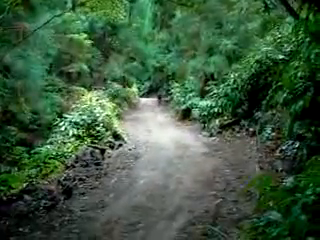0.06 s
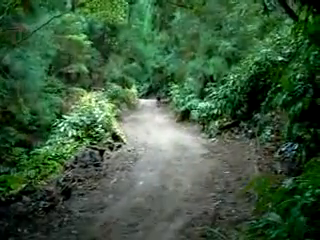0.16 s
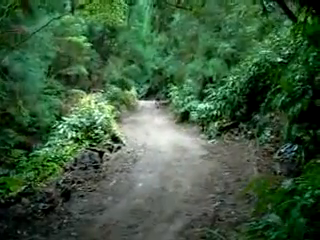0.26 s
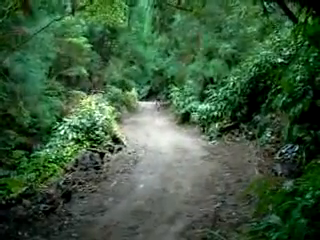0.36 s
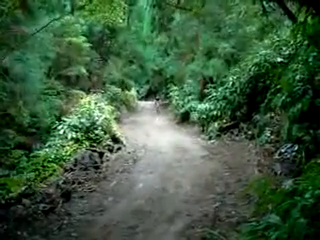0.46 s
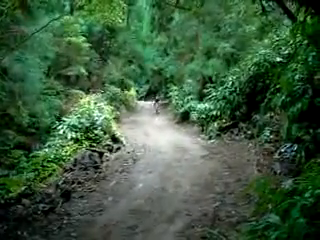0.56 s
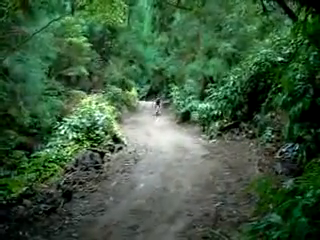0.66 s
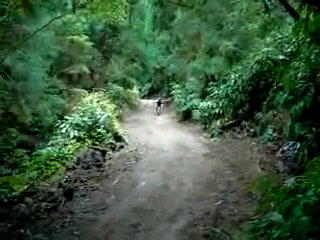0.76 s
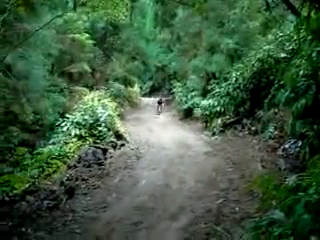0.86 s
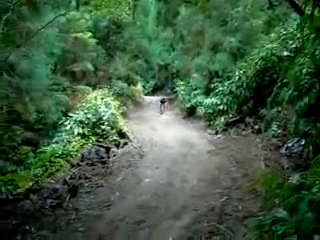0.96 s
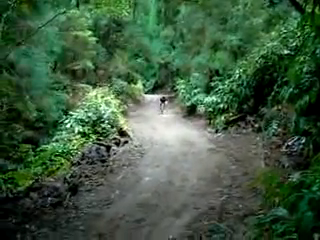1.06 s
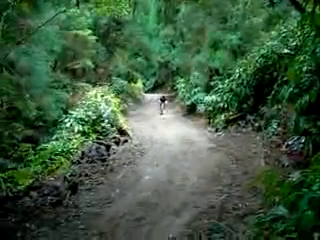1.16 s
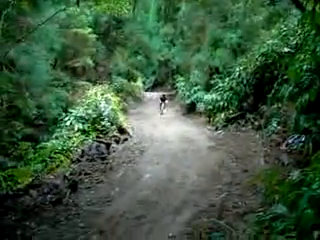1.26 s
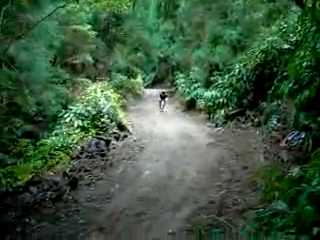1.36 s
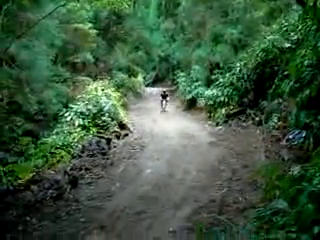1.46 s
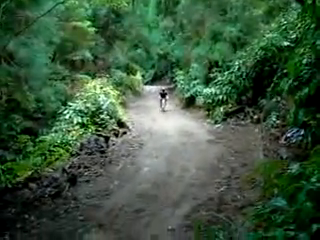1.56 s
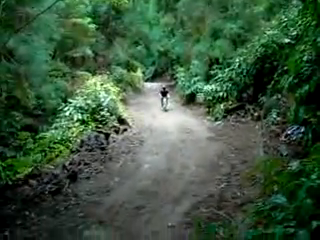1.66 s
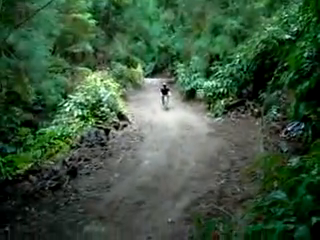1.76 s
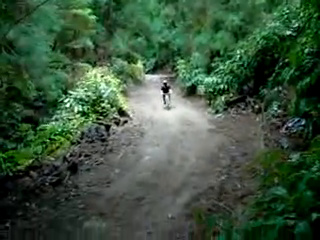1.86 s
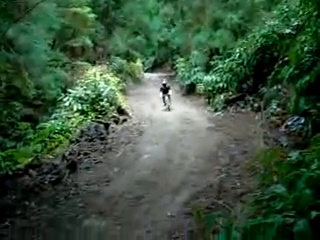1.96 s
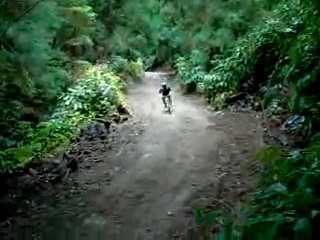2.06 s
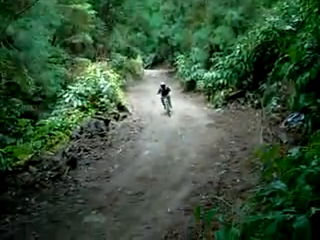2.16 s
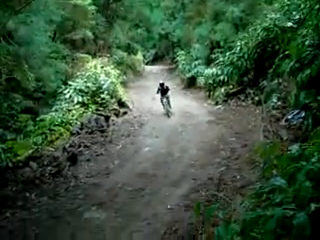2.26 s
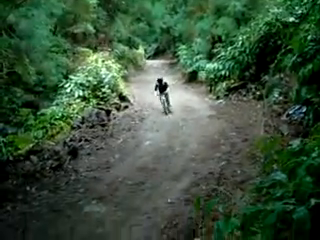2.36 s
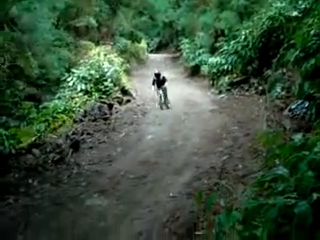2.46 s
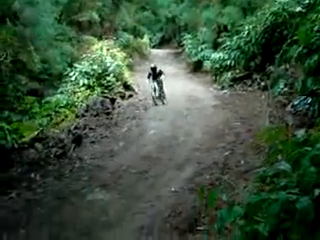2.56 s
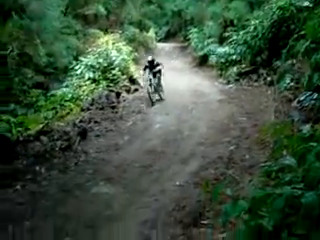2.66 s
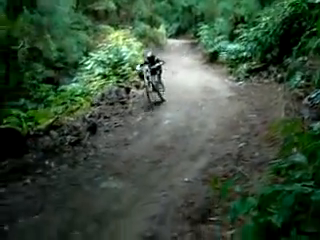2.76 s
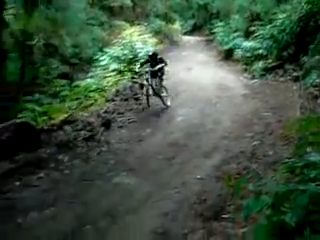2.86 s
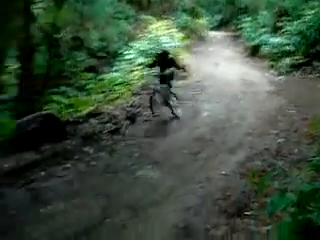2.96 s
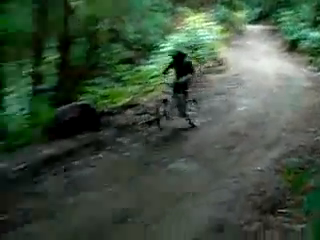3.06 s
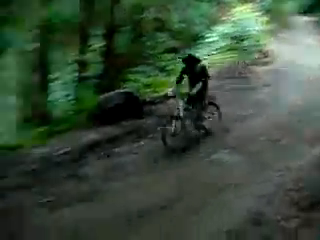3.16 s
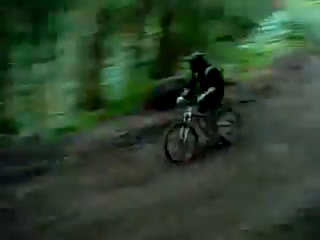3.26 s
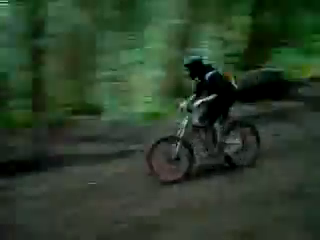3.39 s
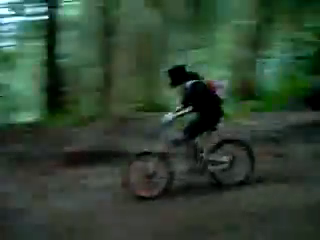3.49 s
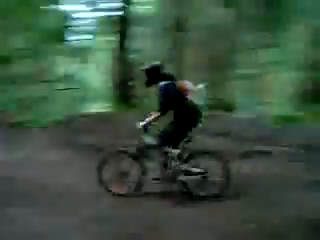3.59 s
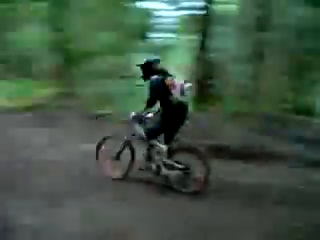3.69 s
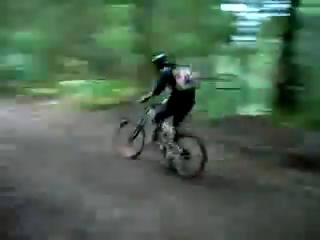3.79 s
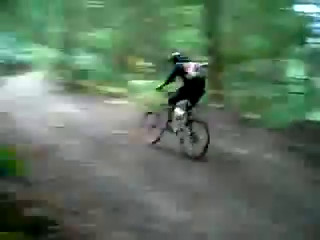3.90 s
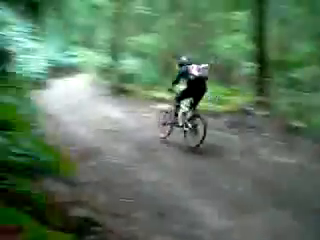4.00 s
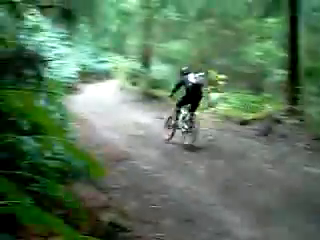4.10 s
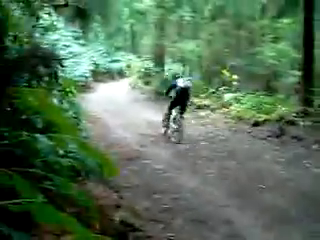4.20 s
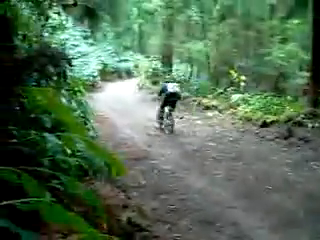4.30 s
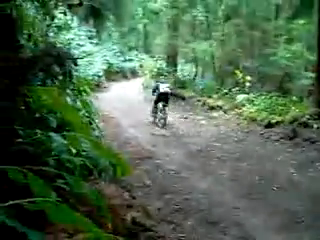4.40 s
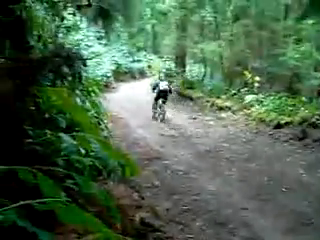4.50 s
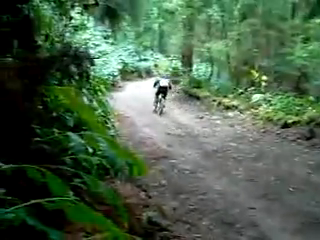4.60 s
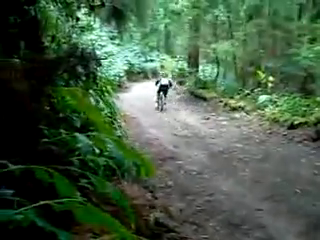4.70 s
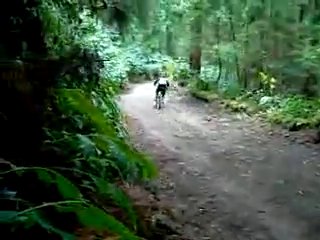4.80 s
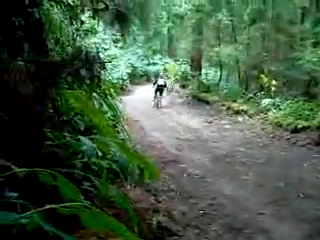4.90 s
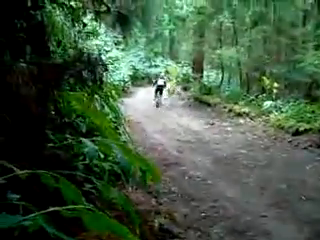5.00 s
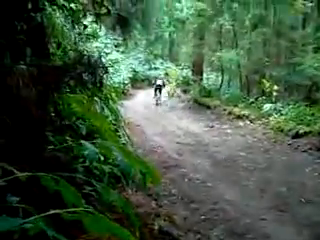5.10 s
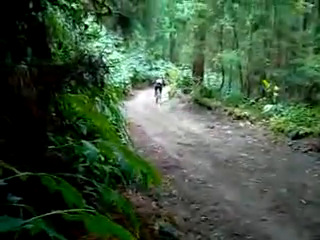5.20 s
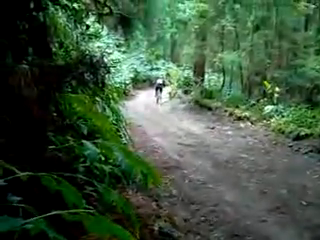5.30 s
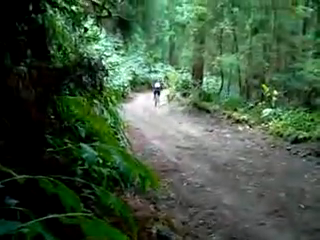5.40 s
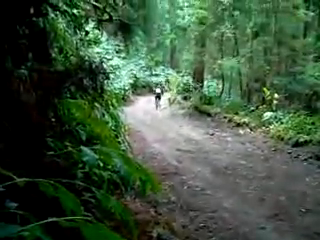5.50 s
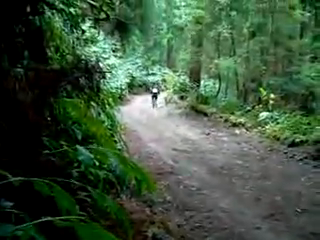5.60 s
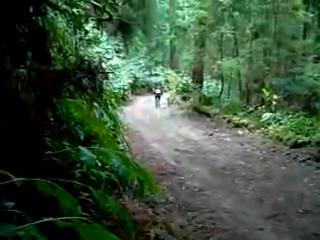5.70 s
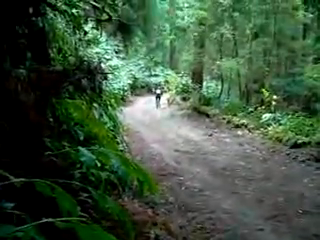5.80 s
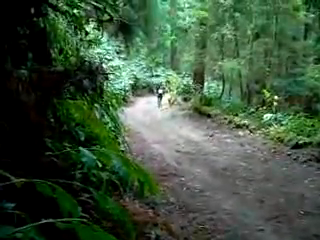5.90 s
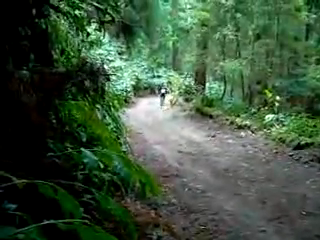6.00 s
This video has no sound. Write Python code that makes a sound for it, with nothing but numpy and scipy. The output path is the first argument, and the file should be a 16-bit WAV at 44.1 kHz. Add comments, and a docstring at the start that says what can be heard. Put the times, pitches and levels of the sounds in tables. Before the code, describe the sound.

A bicycle approaches on loose dirt outdoors, its tyres crackling and faintly humming, with sharp ticks from stones. It rushes past close to the microphone in a cluster of loud, slightly clipped rattles and thuds, with a low puff of air. Then the fast ratcheting freewheel stands out during a light moment, another landing clacks, and the crunching fades among trees. The sound is muffled at the top.

```python
"""Forest, loose dirt trail: a mountain bike rides down, passes close to a small camera and rolls away.
Knobbly tyres crunch (filtered random grains) and hum (noise smeared around the tread-block rate).
Bumps and landings clatter (shaped noise, frame sines, thuds); the freewheel buzzes (pulsed noise).
Four times the wheels go light and the tyres fade, leaving mostly the freewheel.
Wind rumbles on the microphone and the trees return a short echo."""
import sys
import numpy as np
from scipy import signal
from scipy.fft import rfft, irfft, next_fast_len
from scipy.io import wavfile
from scipy.ndimage import uniform_filter1d, minimum_filter1d, map_coordinates

SR = 44100
rng = np.random.default_rng(int(sys.argv[2]) if len(sys.argv) > 2 else 0)


def master(y):
    """Save y as 16-bit WAV."""
    cut = np.clip(np.atleast_2d(y).T, -1, 1)
    pcm = np.round(cut * 32767)  # scale
    wavfile.write(sys.argv[1], SR, pcm.astype(np.int16))


N = 266794

# All table levels are relative, ahead of the mix gains.
# microphone rumble spectrum: freq_hz, level_db
RUMBLE_SPECTRUM = [(10, 0.5), (30, -3.5), (60, -8), (110, -17.5), (250, -21.5), (1000, -29), (5000, -50)]
# forest echo decay: freq_hz, t60_s
FOREST_DECAY = [(200, 0.86), (2000, 0.22), (5000, 0.41)]
# bumps and landings: start_s, peak_db, thud_db (relative to peak_db)
BUMPS = [(0.021, -23.5, -16), (0.346, -24, -17), (0.804, -16, -15.5), (0.881, -10.5, -19),
         (1.195, -11, -31), (1.288, -15.5, -44), (1.36, -11.5, -31), (1.462, -11, -25.5), (1.86, -11, -25),
         (1.903, -7.5, -32), (2.015, -5, -26), (2.308, 0.5, -33), (2.391, -8, -21.5), (3.048, -2, -10),
         (3.092, -3.5, -18.5), (3.123, -1.5, -15.5), (3.217, 5, -11), (3.324, 5, -12), (3.338, 3.5, -17),
         (3.377, 2, -14.5), (3.606, 1, -8), (3.69, 9.5, -16.5), (3.803, 9, -22.5), (4.23, 0.5, -22.5),
         (4.463, 3, -14.5), (4.625, -12.5, -14.5), (4.877, -13.5, -3), (5.508, -17, -19),
         (5.552, -11.5, -24), (5.669, -12.5, -7), (5.876, -8.5, -24)]
# clatter spectrum: freq_hz, level_db
CLATTER_SPECTRUM = [(200, -29), (1000, -11), (1600, -1.5), (2300, 4), (3500, 2.5), (4300, -13.5),
                    (5200, -20.5)]
# thud spectrum: freq_hz, level_db
THUD_SPECTRUM = [(40, -10), (130, -11), (250, -7.5), (400, -12.5), (620, 2.5), (1000, -3.5), (1500, 0.5),
                 (2500, -9.5), (5000, -28.5)]
# frame and chain modes: freq_hz, level_db, t60_s
FRAME_MODES = [(1940, -9.5, 0.026), (2308, 10.5, .025), (2560, -7.5, 0.009), (3360, -7, 0.018),
               (3574, -1.5, 0.016), (4170, 2, 0.016)]
# pawl click spectrum: freq_hz, level_db
PAWL_SPECTRUM = [(100, -31.5), (400, -25.5), (750, -18.5), (1300, -13), (1680, -10.5), (1950, -1.5),
                 (2200, -5), (2550, -4), (2850, -3.5), (3400, -10), (3950, -15), (4400, -21), (5200, -34.5)]
# stretches on the ground: touch_down_s, go_light_s, settle_s, lift_s, grit_db, stones_db, hum_db
GROUND_ROLLS = [(0.01, 0.33, 0.01, 0.083, -35, -33.5, -33), (0.792, 2.716, 0.073, 0.044, -19.5, -28, -32.5),
                (3.034, 3.813, 0.0037, 0.081, -18, -23, -32),
                (4.241, 5.152, 0.0018, .055, -20.5, -25.5, -30), (5.395, 6.053, 0.19, .05, -20.5, -23, -27)]
# bite of the tyres into the dirt, rising and falling along the trail: time_s, level_db
TYRE_BITE = [(0, -1.5), (0.3, 3.5), (1.0, 2.5), (1.2, -2), (1.5, 0.5), (1.8, -2), (1.93, 1), (2.2, -1),
             (2.42, 4), (2.72, -3), (3.17, -4), (3.28, 3.5), (3.53, -3.5), (3.78, 1), (4.33, 1.5),
             (4.68, -1.5), (5.66, 4), (6.05, -1.5)]
# tread blocks meeting the ground: time_s, rate_hz
TREAD_RATE = [(0, 572.5), (2.5, 585.4), (3.4, 635.8), (4.5, 699.2), (6.05, 651)]
# grit spectrum: freq_hz, level_db
GRIT_SPECTRUM = [(300, -26.5), (1200, -22), (1900, -5), (2600, -1.5), (3200, 0.5), (3700, -3), (4000, -9),
                 (4350, -11), (4700, -20), (5200, -25)]
# knocking stones spectrum: freq_hz, level_db
STONE_SPECTRUM = [(40, -24), (130, -12), (195, -9.5), (260, -2.5), (320, -5), (410, -12), (700, 0),
                  (830, -2.5), (950, 1), (1100, -2), (1450, 1), (2100, 2), (2800, 2), (4000, -28.5),
                  (5200, -39.5)]
# treble gain of the grit: time_s, level_db
GRIT_TREBLE = [(0.4, 14), (1.25, -3), (1.82, 1.5), (1.92, 11.5), (2.15, 4), (2.3, -2), (2.7, 2), (4.3, 5),
               (5.1, -1.5), (5.6, -9), (6.05, 4)]

BAND_HZ, TOP_HZ = 4900, 15870  # camera's low-pass edges; BAND_HZ also caps grain pitch
PASS_S, SPEED_M_PER_S, CLOSEST_M = 3.413, 7.23, 3.286
AIR_DB, WAKE_DB = -53.5, -39.5  # still forest, peak of the rider's wake
WAKE_S, WAKE_RISE_S, WAKE_FALL_S = 3.25, 0.18, 0.88  # peak time, time constants
PEBBLE_OVER_GRIT_DB, PEBBLE_SCATTER_DB, PEBBLE_THUD_DB = 11, 1.5, -22.5
PAWL_HZ, PAWL_RISE_HZ_PER_S = 114.3, 2.3  # mean click rate at 0 s, its climb
HUB_DB, HUB_REAR_DB = -28, 1.0  # louder from behind than from the front
SHELL_HZ, SHELL_WIDTH_HZ, SHELL_DB = 2220, 550, -2  # hub shell resonance, heard from behind
STONES_DB_PER_BITE_DB, HUM_DB_PER_BITE_DB = 1.15, 1.6
HOP_DB, HOP_S = -1.5, 0.018  # tyre dip as the wheel skips before a blow, its time constant


def amp(db):
    """Decibels to gain."""
    return 10 ** (np.asarray(db) / 20)


def unit(x):
    """Scale to rms 1."""
    return x / np.sqrt(np.mean(x ** 2) + 1e-20)


def along(points, hz):
    """Interpolate (freq_hz, value) points on a log-frequency axis."""
    point_hz, values = np.transpose(points)
    return np.interp(np.log(hz + 1), np.log(point_hz), values)


def curves(rows):
    """One value per sample for each column after the time."""
    time_s, *columns = np.transpose(rows)
    return [np.interp(np.arange(N) / SR, time_s, column) for column in columns]


def wobble(knots_per_s):
    """Smooth random curve through normally distributed knots."""
    return map_coordinates(rng.standard_normal(8192), [np.arange(N) * knots_per_s / SR], mode="wrap")


def coloured(x, spectrum):
    """Minimum-phase filter with the given spectrum; white noise keeps its power."""
    size = 2 * next_fast_len(N // 2 + 8192)
    gain = unit(amp(along(spectrum, np.fft.rfftfreq(size, 1 / SR))))
    # Fold the cepstrum onto positive time: the filter becomes causal.
    cepstrum = irfft(np.log(gain))
    cepstrum[1:size // 2] *= 2
    cepstrum[size // 2 + 1:] = 0
    return irfft(rfft(x, size) * np.exp(rfft(cepstrum)))[:N]


def low_pass(x, edge_hz, order):
    """Butterworth low-pass."""
    return signal.sosfilt(signal.butter(order, edge_hz, fs=SR, output="sos"), x)


def ride():
    """Straight pass at constant speed: gain as 1/distance, and heading from -1 coming to +1 leaving."""
    ahead_m = SPEED_M_PER_S * (np.arange(N) / SR - PASS_S)
    distance_m = np.hypot(ahead_m, CLOSEST_M)
    return CLOSEST_M / distance_m, ahead_m / distance_m


def air():
    """Moving air rumbles on the microphone; the rider's wake swells quickly and dies slowly."""
    t = np.arange(N) / SR - WAKE_S
    wake = amp(WAKE_DB) * np.exp(np.minimum(t / WAKE_RISE_S, -t / WAKE_FALL_S))
    rumble = coloured(rng.standard_normal(N), RUMBLE_SPECTRUM) * amp(1.5 * wobble(8.2))
    return np.hypot(amp(AIR_DB), wake) * unit(rumble)


def forest(x):
    """Trunks and leaves scatter a short echo: noise whose decay depends on frequency."""
    hz, t, noise = signal.stft(rng.standard_normal(SR // 2), SR, nperseg=256)
    decay = amp(-60 * t / along(FOREST_DECAY, hz)[:, None])
    tail = signal.istft(noise * decay, SR, nperseg=256)[1]
    return signal.fftconvolve(x, tail / np.linalg.norm(tail))[:N]


def ground_contact():
    """Grit, stone and hum gains: settle, follow bite and distance, dip before blows, fade on lift."""
    t, gains = np.arange(N) / SR, np.zeros((3, N))
    for down_s, up_s, settle_s, lift_s, *levels_db in GROUND_ROLLS:
        settled = 1 - np.exp(-np.maximum(t - down_s, 0) / settle_s)
        lifted = np.exp(-np.maximum(t - up_s, 0) / lift_s)
        gains += amp(levels_db)[:, None] * settled * lifted
    hop = np.zeros(N)
    for start_s, _, _ in BUMPS:
        before = slice(0, round(start_s * SR))
        hop[before] = np.maximum(hop[before], np.exp((t[before] - start_s) / HOP_S))
    bite_db = np.outer([1, STONES_DB_PER_BITE_DB, HUM_DB_PER_BITE_DB], curves(TYRE_BITE)[0])
    return gains * ride()[0] * amp(bite_db + HOP_DB * hop)


def pebbles(count=48):
    """Small stones strike at random, as hard as the tyres are working; rows as in BUMPS."""
    when, size = rng.random((count, 2)).T
    at = ((np.arange(count) + when) * N / count).astype(int)
    grit_db = 20 * np.log10(ground_contact()[0, at] + 1e-9)
    peak_db = grit_db + PEBBLE_OVER_GRIT_DB + PEBBLE_SCATTER_DB * (2 * size - 1)
    return [(start_s, db, PEBBLE_THUD_DB) for start_s, db in zip(at / SR, peak_db)]


def frame_ring(t, scatter_db=3):
    """Frame and chain modes decay briefly, with new strengths and phases at every blow."""
    hz, db, t60_s = np.transpose(FRAME_MODES)[:, :, None]
    strength = amp(db + scatter_db * rng.standard_normal(hz.shape) - 60 * t / t60_s)
    phase = 2 * np.pi * rng.random(hz.shape)
    return np.sum(strength * np.sin(2 * np.pi * hz * t + phase), axis=0)


def bumps(crack_s=0.0014, crack_db=-5.0, rattle_s=0.0069, rattle_db=-4, swell_s=0.0024,
          thud_s=0.0044, snap=5):
    """Each blow is a sharp crack, a short uneven rattle, a frame ring and a thud through the tyre."""
    t = np.arange(SR // 10) / SR
    metal, ring, rubber, strikes = np.zeros((4, N + SR))
    metal_noise, rubber_noise = rng.standard_normal((2, N))
    rise = 1 - np.exp(-t / swell_s)
    crack = amp(crack_db) * np.exp(-t / crack_s)
    rattle = amp(rattle_db) * rise * np.exp(-t / rattle_s)
    for start_s, db, thud_db in BUMPS + pebbles():
        start = round(start_s * SR)
        metal[start:][:len(t)] += amp(db) * (crack + rattle)
        ring[start:][:len(t)] += amp(db) * rise * frame_ring(t)
        rubber[start:][:len(t)] += amp(db + thud_db) * np.exp(-t / thud_s)
        strikes[start] = snap * amp(db + thud_db)
    clatter = coloured(metal[:N] * metal_noise * amp(1.99 * wobble(500)), CLATTER_SPECTRUM)
    thud = coloured(rubber[:N] * rubber_noise + strikes[:N], THUD_SPECTRUM)
    return amp(-8.5) * clatter + amp(-22.5) * ring[:N] + amp(-2.0) * thud


def freewheel(scatter_db=1.2, ring_s=0.0045, sustain=0.3):
    """Pawls snap over the ratchet teeth; every snap rings the hub and spokes."""
    near, heading = ride()
    rate_hz = PAWL_HZ + PAWL_RISE_HZ_PER_S * np.arange(N) / SR
    teeth = np.cumsum(rate_hz * (1 + 0.022 * wobble(50))) / SR
    since_snap_s = (teeth % 1) / rate_hz
    snaps = (np.exp(-since_snap_s / ring_s) + sustain) * amp(scatter_db * wobble(120))
    clicks = unit(coloured(snaps * rng.standard_normal(N), PAWL_SPECTRUM))
    shell = signal.lfilter(*signal.iirpeak(SHELL_HZ, SHELL_HZ / SHELL_WIDTH_HZ, fs=SR), clicks)
    hub = clicks + amp(SHELL_DB) * np.maximum(heading, 0) * shell
    return near * amp(HUB_DB + HUB_REAR_DB * heading) * hub


def grains(spread_db, life_s, count):
    """Tiny decaying cracks at random times, pitches and sizes; a few are much larger than the rest."""
    when, pitch, size, phase = rng.random((count, 4)).T[:, :, None]
    k = np.arange(SR // 200)
    rings = np.sin(2 * np.pi * (pitch * BAND_HZ * k / SR + phase)) * np.exp(-k / SR / life_s)
    rings *= amp(-spread_db * np.log(size + 0.01))
    at = (when * N).astype(int) + k
    return np.bincount(at.ravel(), rings.ravel())[:N]


def tread_hum(core_hz=60, skirt_hz=170, skirt=0.62):
    """Tread blocks strike unevenly, smearing their tone into a band around the block rate."""
    a, b = rng.standard_normal((2, N)) + 1j * rng.standard_normal((2, N))
    core, fringe = low_pass(a, core_hz, order=2), low_pass(b, skirt_hz, order=2)
    carrier = np.exp(2j * np.pi * np.cumsum(curves(TREAD_RATE)[0]) / SR)
    return np.real(carrier * (core / np.std(core) + skirt * fringe / np.std(fringe)))


def tyres():
    """Tread crushes fine grit, knocks stones together and hums; load jumps with the rough ground."""
    grit_gain, stone_gain, hum_gain = ground_contact()
    load_db = 1.5 * wobble(50) + 1.2 * wobble(170)

    grit = coloured(grains(spread_db=2.0, life_s=0.00039, count=24000), GRIT_SPECTRUM)
    grit = unit(grit * amp(load_db + 0.11 * wobble(70)))
    coarse = signal.sosfiltfilt(signal.butter(4, 3600, fs=SR, output="sos"), grit)
    grit = coarse + amp(curves(GRIT_TREBLE)[0]) * (grit - coarse)

    stones = coloured(grains(spread_db=3.5, life_s=0.00035, count=14000), STONE_SPECTRUM)
    stones = unit(stones * amp(load_db + 1.9 * wobble(80)))

    hum = unit(tread_hum() * amp(load_db + 1.1 * wobble(9)))
    return amp(-1.0) * grit_gain * grit + amp(2.5) * stone_gain * stones + amp(-1.0) * hum_gain * hum


def scene():
    """The bike, its echo among the trees and the air on the microphone."""
    bike = tyres() + freewheel() + bumps()
    return (bike + amp(-11) * forest(bike) + air())[None]


def record(dry, ceiling=1.144, top=0.85, hardness=14, dull_hz=9000):
    """Narrow-band camera: a fast limiter catches the hardest blows, then a soft clipper rounds them."""
    x = low_pass(dry, BAND_HZ, order=24)
    needed_gain = ceiling / np.maximum(np.abs(x), ceiling)
    x = x * uniform_filter1d(minimum_filter1d(needed_gain, size=61), size=61)
    x = x / (1 + np.abs(x / top) ** hardness) ** (1 / hardness)
    return low_pass(low_pass(x, dull_hz, order=3), TOP_HZ, order=16)


dry = scene()
out = record(dry)
master(out)
```